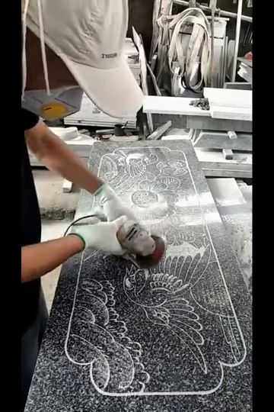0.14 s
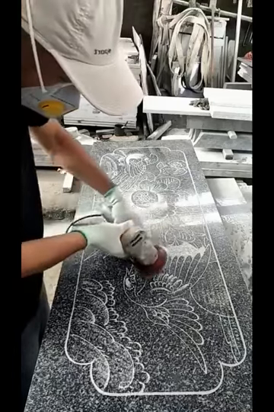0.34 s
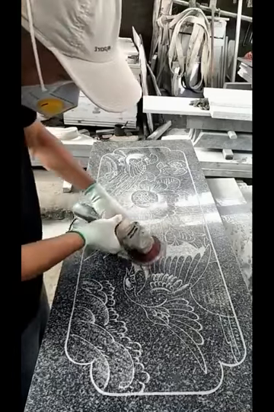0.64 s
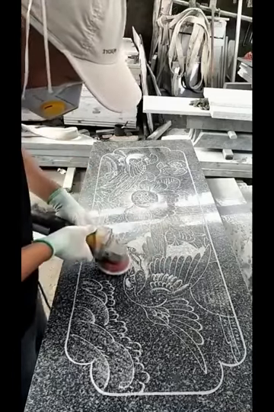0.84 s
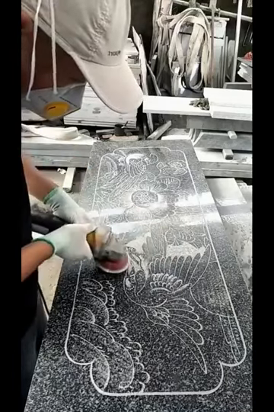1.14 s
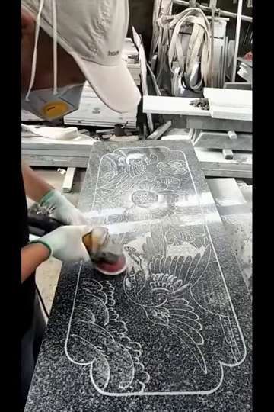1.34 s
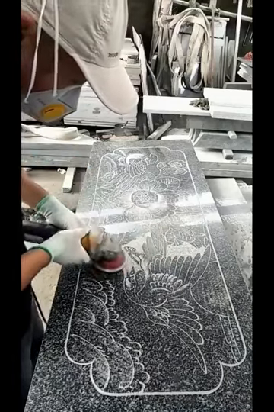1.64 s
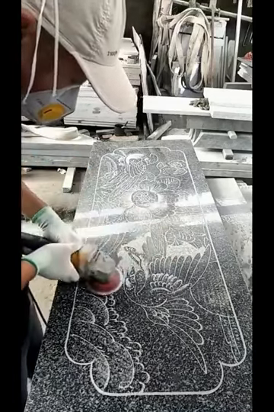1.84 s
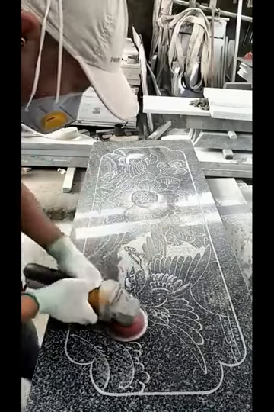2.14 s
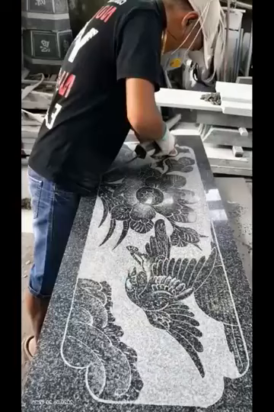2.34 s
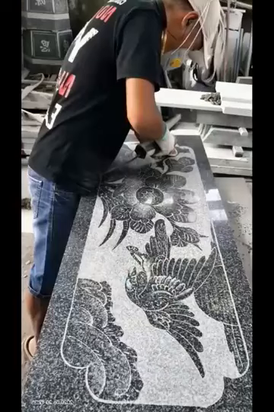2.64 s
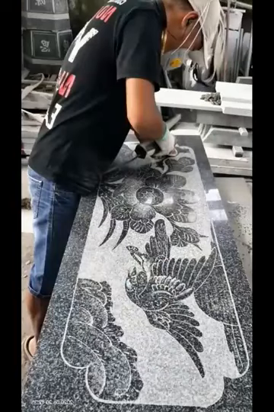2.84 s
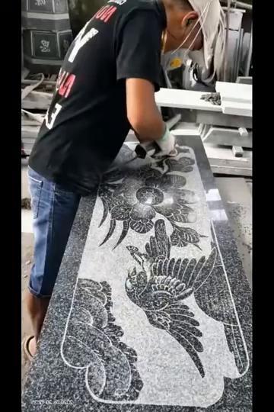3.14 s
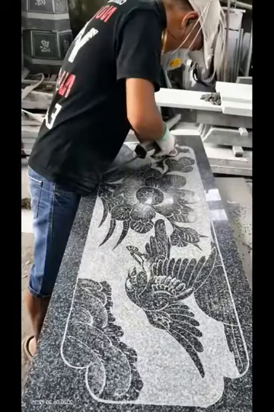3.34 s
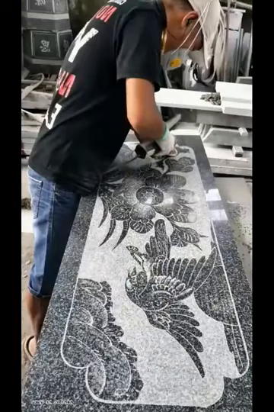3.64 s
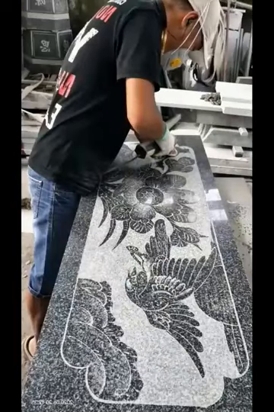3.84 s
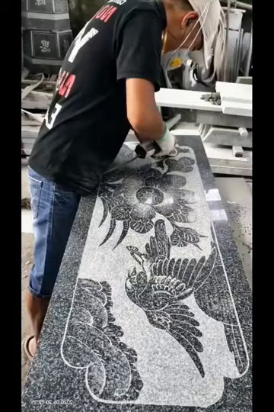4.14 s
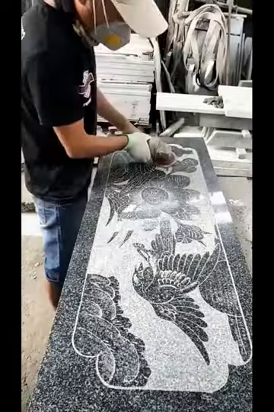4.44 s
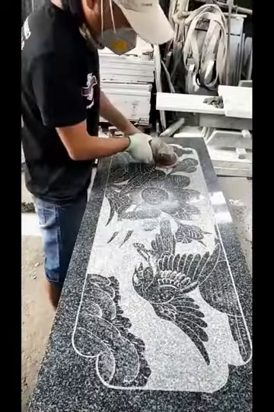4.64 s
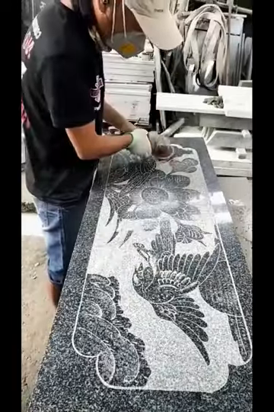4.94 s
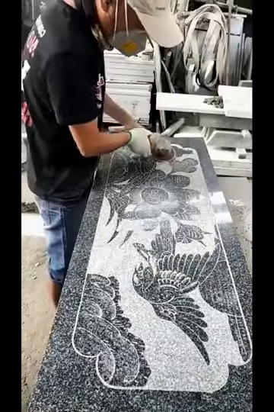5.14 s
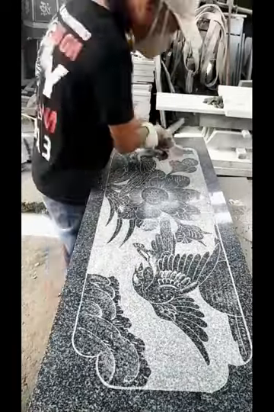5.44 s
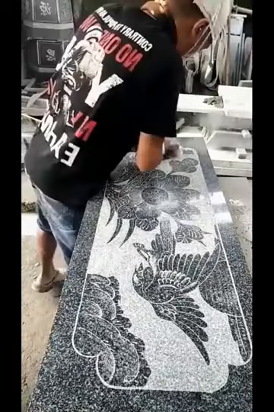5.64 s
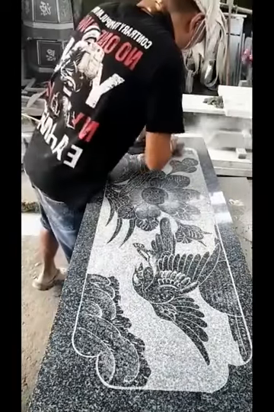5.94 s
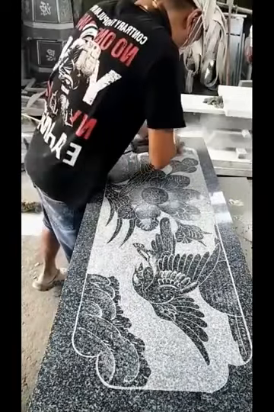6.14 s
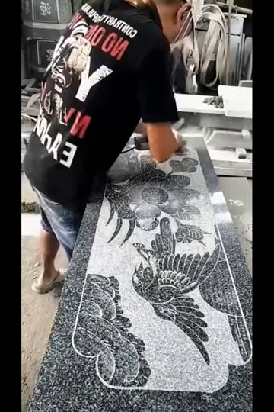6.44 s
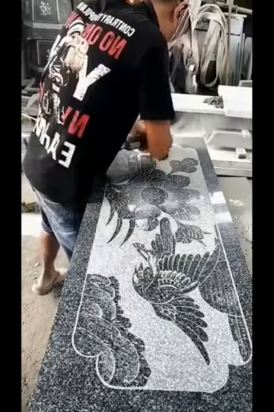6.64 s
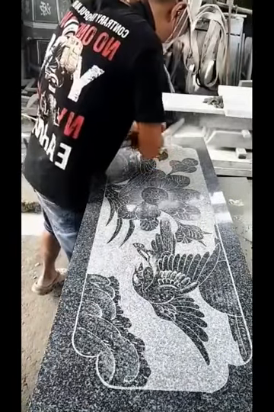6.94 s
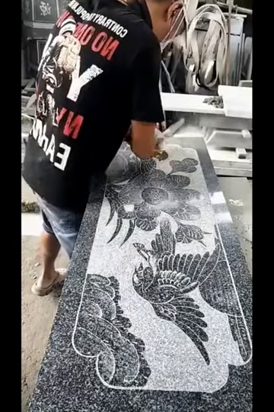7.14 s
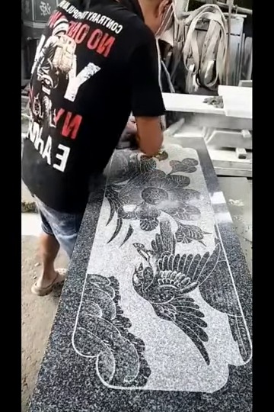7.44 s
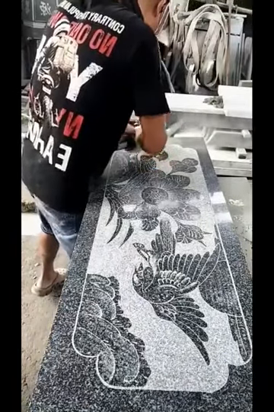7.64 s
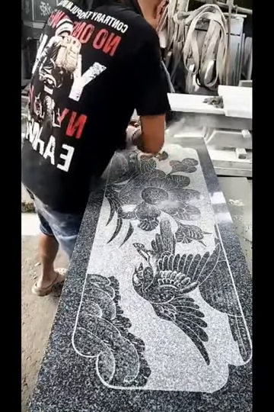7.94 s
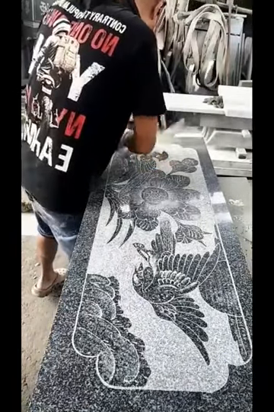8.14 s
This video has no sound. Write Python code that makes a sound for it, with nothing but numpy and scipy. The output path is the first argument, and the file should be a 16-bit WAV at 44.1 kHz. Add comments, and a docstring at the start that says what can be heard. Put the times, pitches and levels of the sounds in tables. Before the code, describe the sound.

Close mono sound of an angle grinder carving a granite slab in a workshop. It bites at once, with harsh, ringing, gritty strokes of uneven length, the motor sagging and recovering. After a short free-running stretch come quick, duller dabs several times a second to the end. A steady hum, singing motor tones and hissing cooling air continue throughout over a faint low rumble.

```python
"""A stone-cutting disc bites at once: an angle grinder carves granite in a workshop, heard close by in mono.
In each touch the disc's high spot knocks once a turn and rings the disc, and grit scrapes.
Long strokes make the speed sag; a run of quick dabs follows.
Throughout, the shaft hums, motor tones sing, fan air hisses and rings its vents, and the hall rumbles."""
import sys
import numpy as np
from scipy import signal
from scipy.fft import rfft, irfft
from scipy.io import wavfile

SR = 44100
rng = np.random.default_rng(int(sys.argv[2]) if len(sys.argv) > 2 else 0)


def inscribe(sig):
    """Save sig as 16-bit PCM at rate SR to the path in sys.argv[1].

    A 1-D sig is mono; a 2-D sig holds one channel per row.
    Samples are clipped to [-1, 1] before scaling.
    """
    pcm = np.round(np.clip(np.atleast_2d(sig).T, -1, 1) * 32767)
    wavfile.write(sys.argv[1], SR, pcm.astype(np.int16))


N = 366030
TIME = np.arange(N) / SR
FREQ = np.maximum(np.arange(N // 2 + 1) * SR / N, 1)
MODERATE_DB = -25  # force at which the disc modes have their listed strength


def undb(db):
    """Decibels to gain."""
    return 10 ** (np.asarray(db) / 20)


def unit(x):
    """Scale to rms 1."""
    return x / np.sqrt(np.mean(x ** 2))


def curve(table):
    """Second column of a timed table, interpolated at every sample."""
    t_s, value = np.transpose(table)
    return np.interp(TIME, t_s, value)


def walk(rate_hz):
    """Smooth random curve of rms 1 that changes about rate_hz times a second."""
    steps = rng.standard_normal(N // 8)
    return unit(np.interp(TIME * rate_hz * 2, np.arange(len(steps)), steps))


def colour(x, points):
    """Shape x by a spectrum of (f/Hz, level/dB) points, log-interpolated in f; rms 1."""
    hz, db = np.transpose(points)
    gain = undb(np.interp(np.log(FREQ), np.log(hz), db))
    return unit(irfft(rfft(x) * gain, N))


def ring(x, modes):
    """Each resonance driven by x; neighbouring modes swing in opposite senses."""
    drive = rfft(x)
    sounds = []
    for k, (hz, width_hz, db, *_) in enumerate(modes):
        detuning = (FREQ / hz - hz / FREQ) * hz / width_hz
        sounds.append((-1) ** k * undb(db) * irfft(drive / (1 + 1j * detuning), N))
    return sounds


def touch(start_s, end_s, bite_s, lift_s):
    """One contact, 0-1: the disc bites in, holds and lifts off."""
    return np.clip(.5 + np.minimum((TIME - start_s) / bite_s, (end_s - TIME) / lift_s), 0, 1)


def chipping(start_s, extra=0.27, chip_s=0.0026):
    """The first bite chips off more stone than the rest of the touch."""
    return 1 + extra * np.maximum(1 - np.abs(TIME - start_s - chip_s) / (2 * chip_s), 0)


# long strokes: start t/s, end t/s, full force/dB, how much lighter it begins/dB (negative = harder),
# speed cost if held/Hz
STROKES = [(0.0, 0.074, -27, -2.5, 25.5), (0.455, 0.503, -28, 1.0, 9.5), (0.832, 0.912, -25.5, 2.5, 15),
           (0.927, 1.112, -26.5, 5.5, 26.5), (1.124, 1.225, -23.5, 0.5, 44),
           (1.425, 1.655, -24.0, 6.5, 36.6), (2.315, 2.441, -24.5, 7, 15.7), (2.746, 2.952, -27, 3.5, 13.1),
           (3.095, 3.205, -23, 7.0, 20.3), (3.487, 3.647, -25, 3, 17.7), (3.747, 3.88, -23.5, 6.5, 14),
           (3.996, 4.232, -26.0, 4, 25.6), (4.357, 4.672, -27.5, -1, 22.2), (4.685, 4.802, -25.5, 1, 20.3),
           (4.808, 4.896, -23.5, 0.5, 34.5)]


def strokes(bite_s=.014, lift_s=0.027, tilt_db_per_octave=-.5, tremor_db=0.23, lean_in_s=0.039):
    """Force, grit, knock tilt and braking (Hz) as the hand leans in and the stone brakes the disc."""
    force, grit, tilt, braking_hz = np.zeros((4, N))
    hand = undb(tremor_db * walk(9))
    for start_s, end_s, db, lighter_db, cost_hz in STROKES:
        on = touch(start_s, end_s, bite_s, lift_s)
        lean_db = lighter_db * np.exp(-np.maximum(TIME - start_s, 0) / lean_in_s)
        push = on * hand * undb(db - lean_db)
        force += push
        grit += push * chipping(start_s)
        tilt += on * tilt_db_per_octave
        braking_hz += on * cost_hz
    return force, grit, tilt, braking_hz


# quick dabs: start t/s, length/s, force/dB
DABS = [(5.453, 0.051, -28), (5.567, .033, -27.5), (5.66, 0.039, -28), (5.757, 0.032, -26.5),
        (5.842, 0.051, -28), (5.934, .032, -26), (6.015, 0.027, -25.5), (6.086, 0.03, -24),
        (6.216, .036, -28.5), (6.388, 0.025, -27.5), (6.475, 0.026, -28), (6.554, 0.031, -29.5),
        (6.634, .027, -27), (6.708, 0.02, -29), (6.781, .016, -24.5), (6.95, 0.028, -26.5),
        (7.039, .029, -26.5), (7.132, 0.016, -31.5), (7.208, .027, -29.5), (7.276, .047, -29),
        (7.356, 0.025, -28.5), (7.427, 0.017, -26), (7.589, .034, -25.5), (7.68, 0.027, -25.5),
        (7.767, .031, -25.5), (7.839, 0.038, -25), (7.913, 0.032, -25), (7.983, 0.023, -25),
        (8.163, .036, -28.5), (8.251, .034, -29)]


def dabs(bite_s=0.0068, lift_s=.022, tilt_db_per_octave=-2.0, grit_db=-4.0):
    """Force, grit and knock tilt of touches too short to slow the disc; duller, with less grit."""
    force, grit, tilt = np.zeros((3, N))
    for start_s, length_s, db in DABS:
        on = touch(start_s, start_s + length_s, bite_s, lift_s)
        force += on * undb(db)
        grit += on * undb(db + grit_db) * chipping(start_s)
        tilt += on * tilt_db_per_octave
    return force, grit, tilt


# unbraked spindle speed: t/s, turns a second f/Hz
FREE_SPEED = [(0, 466.5), (0.6, 467.1), (1.9, 473.3), (2.25, 474.1), (3.4, 475.6), (4.5, 471.4),
              (5.4, 477.5), (6.8, 476.3), (7.25, 475), (7.7, 476), (8.3, 479)]


def spindle(braking_hz, waver_hz=.4, lag_s=.21):
    """Turns a second: speed sags under load and climbs back, both slowed by rotor inertia."""
    keep = np.exp(-1 / (lag_s * SR))
    sag_hz = signal.lfilter([1 - keep], [1, -keep], braking_hz)
    return curve(FREE_SPEED) - sag_hz + waver_hz * walk(8)


def knocks(angle, tilt, jitter_rad=0.05, wander_db=2.5, pivot_order=6, count=32):
    """One knock a turn, slightly early or late; overtones tilt by kind of touch, duller in dabs, and wander."""
    struck = angle + jitter_rad * walk(115)
    out = 0
    for k in range(1, count + 1):
        octaves = min(np.log2(k / pivot_order), 1)  # tilt levels off an octave above the pivot
        db = tilt * octaves + wander_db * walk(9)  # the contact point travels
        out = out + undb(db) * np.sqrt(2) * np.cos(k * struck)
    return out


# modes of disc and gear head: f/Hz, width/Hz, level/dB, extra dB per dB of force (negative = damped by pressing)
DISC = [(933, 99, -13.5, -0.2), (1411, 64, -7.5, -.1), (1780, 250, -3, 0.8), (2247, 186, 0, 0),
        (2836, 175, -0.5, -0.4), (3189, 92, 1, 0), (3734, 127, -7.5, -0.3), (4160, 21, 1.5, -3),
        (4480, 200, -7, 2.4), (4820, 210, 0, 0), (5093, 110, -1, 0.5), (5190, 200, -4, 3),
        (6580, 134, -9, 2.5), (7275, 43, -5.5, -0.5), (7920, 78, -9.5, 2.5)]
# stone grit spectrum: f/Hz, relative level/dB
GRIT = [(600, -4), (1000, -1.5), (1600, 14.5), (2600, 7.5), (4000, 4), (5200, 14), (7000, 0.5), (9500, 6),
        (13500, 0), (15500, -2.5)]


def grinding(angle, speed_hz, force, grit, tilt, knock_db=-2.2, chatter_db=1.3, scrape_db=-16,
             tick_db=-21, grit_db=-4, grain_db=2.0, focus=0.13):
    """Knocks and scraping ring the disc; stone grains break off in a burst every turn and the edge ticks."""
    blows = knocks(angle, tilt)
    bursts = np.exp(focus * np.cos(angle)) * undb(grain_db * walk(2500))
    grains = unit(rng.standard_normal(N) * bursts)
    # scrape_db is the noise lying between two overtones of the knock
    scrape = undb(scrape_db) * grains * np.sqrt(SR / 2 / np.mean(speed_hz))
    modes = ring(undb(knock_db) * blows + scrape, DISC)
    # a light touch rings the free rim; pressing damps it and brings out other modes
    load = force / undb(MODERATE_DB)
    pressed = [mode * load ** max(1 + extra, .4) for mode, (*_, extra) in zip(modes, DISC)]
    disc = undb(MODERATE_DB) * sum(pressed)
    stone = undb(grit_db) * grit * colour(grains + undb(tick_db) * blows, GRIT)
    return (disc + stone) * undb(chatter_db * walk(47.3))


# tool turned in the hand, hum and whistle fade: t/s, half length/s, fade/dB
TURNS = [(1.81, 0.064, 9.5), (5.171, 0.052, 11)]


def turned_away():
    """Decibels lost while the tool is being turned."""
    return sum(db * np.exp(-((TIME - t_s) / half_s) ** 2) for t_s, half_s, db in TURNS)


def dips(dips_per_s=1.2, dab_share=.5, lead_s=0.0039, dip_s=0.0085):
    """Brief dips of the hum, 0-1: often just as a dab lands, others at random times."""
    landings_s = np.array(DABS)[:, 0] - lead_s
    at_dabs_s = landings_s[rng.random(len(landings_s)) < dab_share]
    others_s = (np.arange(32) + rng.random(32)) / dips_per_s
    moments_s = [*at_dabs_s, *others_s[others_s < TIME[-1]]]
    nearest_s = np.min([np.abs(TIME - t_s) for t_s in moments_s], axis=0)
    return np.exp(-(nearest_s / dip_s) ** 2)


def hum(angle, braking_hz, free_db=-32.5, damping_db=10, heavy_hz=40.4, damping_power=1.14, depth=0.91):
    """Unbalance shakes the tool once a turn; the harder the stone holds the disc, the more it damps this."""
    db = free_db - damping_db * (braking_hz / heavy_hz) ** damping_power - turned_away()
    return undb(db) * (1 - depth * dips()) * unit(np.sin(angle))


# gear and bearing tones (odd fractions = bearings): multiple of shaft speed, level/dB
MOTOR = [(2, -41), (3, -62.5), (4, -51), (5, -57.5), (6, -53), (8, -44.5), (10, -46.5), (10.7, -46.5),
         (11, -68), (11.25, -44), (11.75, -46), (12.77, -45.5), (14, -51.5), (15, -52.5), (16, -50.5),
         (16.6, -63.5), (17, -48.5)]


def motor(angle, waver_db=2, slip_rad=.06):
    """Gear and bearing tones; slight slip blurs the higher ones most."""
    out = 0
    for multiple, db in MOTOR:
        phase = multiple * (angle + slip_rad * walk(30))
        out = out + undb(db + waver_db * walk(25)) * np.sqrt(2) * np.sin(phase)
    return out


# fan air spectrum: f/Hz, relative level/dB
FAN_RUSH = [(560, -61), (640, -7), (760, -2.5), (1150, 3), (1500, 0.5), (1800, 3.5), (2050, -2), (2650, -7),
            (3200, -4.5), (4200, -6), (7700, -5), (10300, -18.5), (13000, -15), (15500, -19.5)]
# air vent resonances: f/Hz, width/Hz, relative level/dB
VENT_MODES = [(3705, 82, 0), (5240, 150, 3), (5770, 110, 0), (5580, 220, -15)]


def fan(angle, speed_hz, rush_db, whistle_db, chop=0.28, speed_power=2.7, turn_share=0.72, drift_db=2.34):
    """Cooling air, chopped by the rotor and stronger at speed, rings vents that flutter independently."""
    flow = (speed_hz / np.mean(speed_hz)) ** speed_power
    blades = 1 + chop * np.cos(angle)
    rush = colour(rng.standard_normal(N) * blades, FAN_RUSH) * undb(rush_db + 0.67 * walk(14))
    modes = ring(rng.standard_normal(N) * blades, VENT_MODES)
    vents = unit(sum(mode * undb(1.7 * walk(11)) for mode in modes))
    vents_db = whistle_db + drift_db * walk(1.39) - turn_share * turned_away()
    return flow * (rush + vents * undb(vents_db))


def sizzle(angle, level_db=-46.0, first_order=18, count=15, flicker_db=5, slip_rad=.07):
    """Faint high tones at whole multiples of the shaft speed, flickering in the hiss."""
    tones = 0
    for k in range(first_order, first_order + count):
        tones = tones + undb(flicker_db * walk(11)) * np.sin(k * (angle + slip_rad * walk(45)))
    return undb(level_db) * colour(tones, FAN_RUSH)


def reflections(x, wet_db, t60_s):
    """Stacked slabs and walls send back a short diffuse echo: decaying noise after a 4 ms gap."""
    t = TIME[:SR // 2]
    tail = rng.standard_normal(len(t)) * np.exp(-np.log(1000) * t / t60_s) * (t > .004)
    return x + undb(wet_db) * signal.fftconvolve(x, tail / np.linalg.norm(tail))[:N]


# hall rumble spectrum: f/Hz, relative level/dB
WORKSHOP = [(20, -14), (60, -10.5), (130, -3.5), (200, -6), (340, -2.5), (400, -12), (560, -18),
            (2000, -19)]
# hall rumble course: t/s, level/dB
HALL = [(0, -48.5), (1.2, -55.5), (2.2, -49.5), (4, -48), (6.3, -52.5), (8.3, -51.5)]


def workshop():
    """Low rumble of the hall: coloured noise of wavering level."""
    return colour(rng.standard_normal(N), WORKSHOP) * undb(curve(HALL) + 1.7 * walk(4.5))


def scene():
    """Contact brakes the spindle, every tool part follows; the vents face away, so their air has more echo."""
    stroke_force, stroke_grit, stroke_tilt, braking_hz = strokes()
    dab_force, dab_grit, dab_tilt = dabs()
    speed_hz = spindle(braking_hz)
    angle = 2 * np.pi * np.cumsum(speed_hz) / SR
    disc = grinding(angle, speed_hz, stroke_force + dab_force, stroke_grit + dab_grit, stroke_tilt + dab_tilt)
    cutting = reflections(disc, wet_db=-17, t60_s=.09)
    air = reflections(fan(angle, speed_hz, rush_db=-35.5, whistle_db=-38), wet_db=-6, t60_s=0.064)
    mono = cutting + hum(angle, braking_hz) + motor(angle) + air + sizzle(angle) + workshop()
    return np.array([mono, mono])


def record(dry, top_hz=15700):
    """The phone cuts the top: steep elliptic low-pass."""
    return signal.sosfilt(signal.ellip(10, .2, 80, top_hz, fs=SR, output="sos"), dry)


dry = scene()
out = record(dry)
inscribe(out)
```